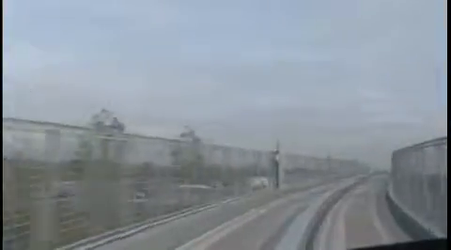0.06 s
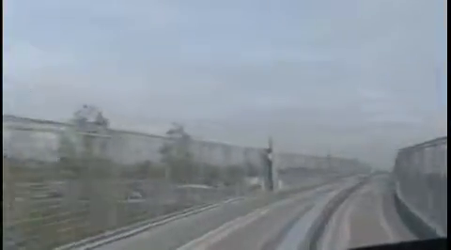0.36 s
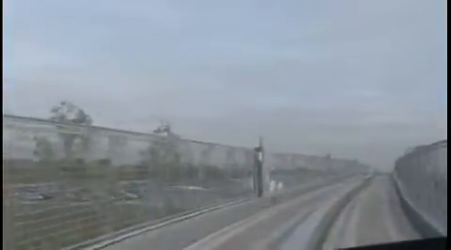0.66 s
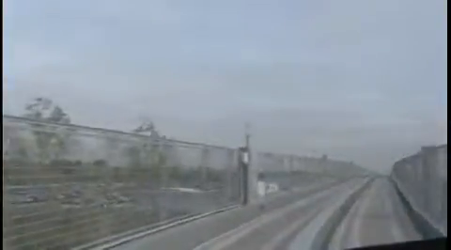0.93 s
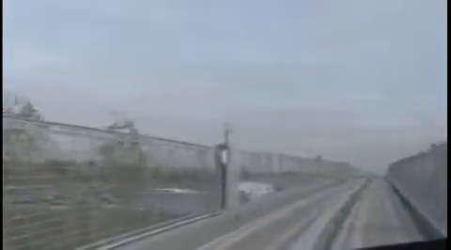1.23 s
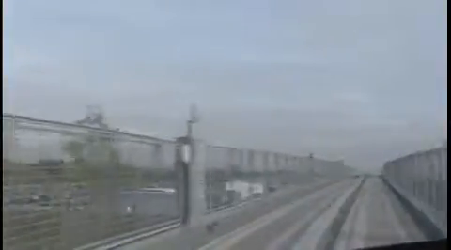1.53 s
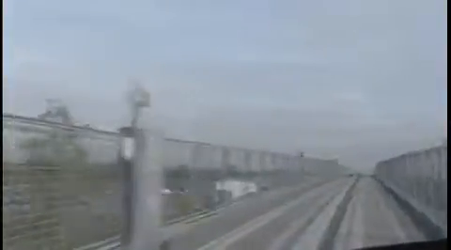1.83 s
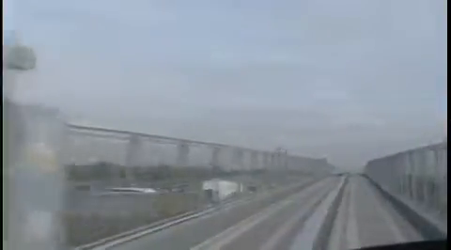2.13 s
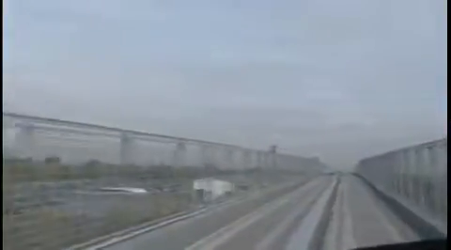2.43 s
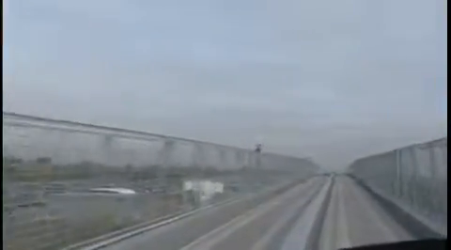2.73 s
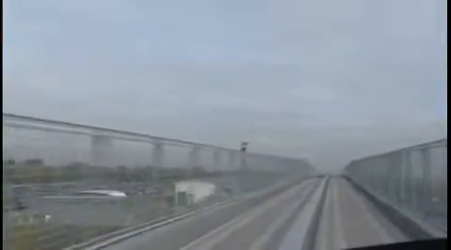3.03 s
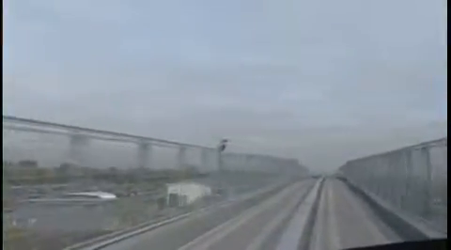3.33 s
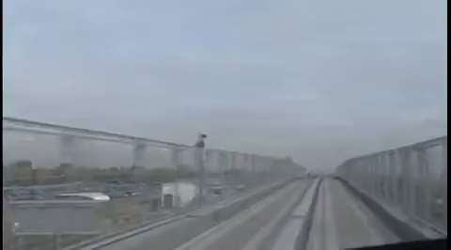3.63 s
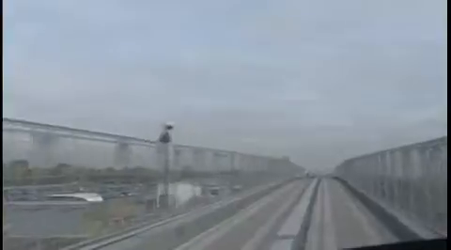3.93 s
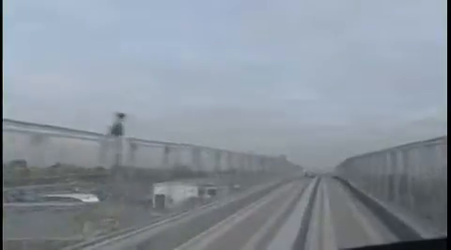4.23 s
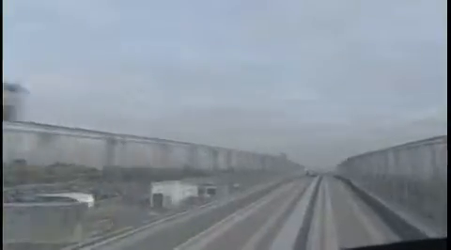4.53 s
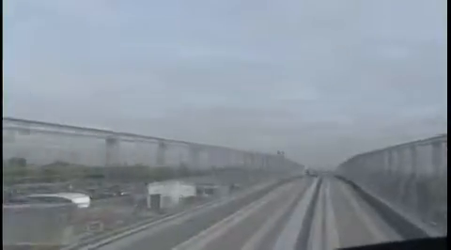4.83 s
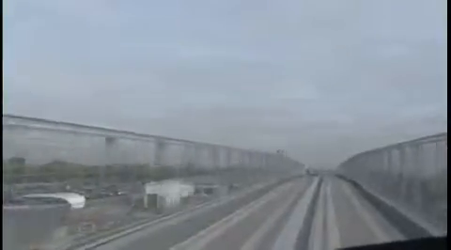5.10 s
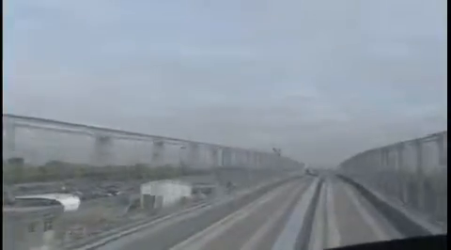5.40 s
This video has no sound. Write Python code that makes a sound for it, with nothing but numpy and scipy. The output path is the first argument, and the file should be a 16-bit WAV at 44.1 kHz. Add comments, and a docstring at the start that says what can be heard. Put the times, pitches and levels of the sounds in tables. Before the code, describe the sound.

Heard from the front of a small electric pod's cabin, rubber tyres roll at a steady speed over a concrete track, making a deep rumble above a low motor hum. Dull thumps come unevenly from bumps. Plastic trim ticks lightly, a loose fitting chatters faintly, and a latch clacks once before the middle. Something soft rustles now and then, and a panel gives a brief rasp near the end.

```python
"""Inside a small electric pod running at a steady speed along a concrete guideway.
The tyres roll over the rough track and make the cabin boom, with harder thumps at the bumps.
The turning drive hums, its electronics whine faintly and the air vents hiss. Plastic trim ticks,
a loose fitting chatters and a jolted latch clacks once. Something soft rustles now and then,
and near the end a bump makes a panel rasp against its seal."""
import sys
import numpy as np
from scipy import signal
from scipy.fft import rfft, irfft
from scipy.io import wavfile
from scipy.ndimage import uniform_filter1d

SR = 44100
rng = np.random.default_rng(int(sys.argv[2]) if len(sys.argv) > 2 else 0)


def wrap_up_sound(samples):
    """Save the sound to the file named by the first command line argument, as 16-bit audio."""
    columns = np.atleast_2d(samples).T
    # keep every value between -1 and 1, then stretch to whole-number steps
    tamed = np.clip(columns, -1, 1)
    steps = np.round(tamed * 32767).astype(np.int16)
    wavfile.write(sys.argv[1], SR, steps)


N = 245188
TIME = np.arange(N) / SR
BINS_HZ = np.maximum(np.arange(N // 2 + 1) * SR / N, 1)


def undb(db):
    """Turn decibels into a number to multiply by."""
    return 10 ** (np.asarray(db) / 20)


def unit(x):
    """Scale a sound to an average power of 1."""
    return x / np.sqrt(np.mean(x ** 2))


def even(x, span_s):
    """Hold the power near 1 over every stretch of span_s."""
    return x / np.sqrt(uniform_filter1d(x ** 2, max(int(span_s * SR), 2)) + 1e-12)


def curve(table):
    """Join (time_s, value) points with straight lines."""
    return np.interp(TIME, *np.transpose(table))


def noise():
    """White noise: an even hiss."""
    return rng.standard_normal(N)


def wander(rate_hz):
    """A smooth random drift of size about 1; a higher rate_hz makes it quicker."""
    return unit(irfft(rfft(noise()) * np.exp(-(np.arange(len(BINS_HZ)) * SR / N / rate_hz) ** 2), N))


def colour(x, points):
    """Shape a sound's bass and treble by (pitch_hz, gain_db) points, fading beyond both ends."""
    hz, db = np.transpose(points)
    ends = np.minimum(BINS_HZ / hz[0], 1) ** 2 * np.minimum(hz[-1] / BINS_HZ, 1) ** 2
    gain = undb(np.interp(np.log(BINS_HZ), np.log(hz), db))
    return irfft(rfft(x) * ends * gain, N)


def ring(x, notes):
    """Make a sound ring at (pitch_hz, width_hz, gain_db) notes; narrow ones last longer."""
    response = sum(undb(db) / (1 + 1j * (BINS_HZ ** 2 - hz ** 2) / (BINS_HZ * width_hz)) ** 2
                   for hz, width_hz, db in notes)
    return irfft(rfft(x) * response / np.sqrt(np.mean(np.abs(response) ** 2)), N)


def swell(peak_s, rise_s, fall_s):
    """A level that rises smoothly to 1 at peak_s and falls again."""
    distance = (TIME - peak_s) / np.where(TIME < peak_s, rise_s, fall_s)
    return 1 / np.cosh(np.clip(distance * np.sqrt(2), -20, 20))


def grains(spread_db):
    """Gritty noise: many tiny slips of unequal size."""
    return unit(noise() * undb(spread_db * wander(770)))


def hit(start_s, db):
    """One hard contact, a single sample long."""
    return undb(db) * (np.arange(N) == int(start_s * SR))


def rebounds(start_s, db, count, gap_s=(.003, .007), loss_db=3):
    """Ever weaker bounces at uneven gaps after start_s."""
    times = start_s + np.cumsum(rng.uniform(*gap_s, count))
    return sum(hit(at_s, db - loss_db * k) for k, at_s in enumerate(times))


def sway(mean_db, sway_db, loudest_s, cycle_s=2.2):
    """A level in decibels that swells and fades in a slow cycle."""
    return mean_db + sway_db * np.cos(2 * np.pi * (TIME - loudest_s) / cycle_s)


def tones(rows, waver_db, drift):
    """Thin (pitch_hz, level_db) tones that waver in level and, through drift, a little in pitch."""
    return sum(np.sqrt(2) * undb(db + waver_db * wander(13))
               * np.sin(2 * np.pi * hz * TIME + drift * wander(25)) for hz, db in rows)


# How loudly the rough track makes the cabin boom: time_s, level_db
BOOM_LEVEL = [(0, -27.5), (.45, -27), (.88, -26), (1.05, -28), (1.9, -26), (2.2, -26.5), (2.8, -25.5),
              (3.25, -27.5), (3.7, -24), (4.05, -26.5), (4.55, -25.5), (4.95, -27.5), (5.15, -25.5),
              (5.33, -33), (5.56, -25)]
# The deep boom of the cabin air: pitch_hz, gain_db
BOOM_COLOUR = [(15, -20.5), (24, -16), (33, 1), (42, -10.5), (58, -1), (70, 0), (85, -1), (104, -0.5),
               (125, -11.5), (150, -20), (220, -48)]
# The drone of the pod's body, also heard when a bump thuds: pitch_hz, gain_db
BODY_COLOUR = [(90, -16), (135, 2), (175, -2), (215, -6), (280, -21.5)]
# The tread's roar, heard through the shell: pitch_hz, gain_db
ROAR_COLOUR = [(300, -11), (450, 3), (700, -1.5), (830, -4), (895, -4), (1050, -2), (1170, -5.5),
               (1340, -11.5), (1700, -10), (1880, -17), (2400, -21.5), (2740, -33.5), (5000, -42),
               (9000, -44)]
# The hollow notes of the cabin: pitch_hz, width_hz, gain_db
CABIN_NOTES = [(572.7, 42, -0.5), (823.5, 82, -6), (948, 82, -3.5), (1076, 85, -6), (1235, 80, -17.5),
               (1464, 130, -12), (1980, 75, -19.5), (2263, 270, -22.5), (2574, 70, -22), (2854, 110, -25.5),
               (3180, 150, -31)]
# The rumble of the floor and wall panels: pitch_hz, gain_db
PANEL_COLOUR = [(190, -4.5), (260, 0.5), (310, 1.5), (360, -4.5), (430, -3), (520, -17.5)]
# How loud those panels are: time_s, level_db
PANEL_LEVEL = [(0, -48.5), (.75, -46), (.9, -52), (1.1, -45), (1.4, -53.5), (1.65, -44.5), (2.05, -46.5),
               (2.75, -49), (3.9, -49), (4.75, -49), (4.9, -47.5), (5.13, -46.5), (5.3, -50.5),
               (5.56, -50.5)]


def tyres():
    """The rough track shakes the air, body and panels; the tread roars and the hollow cabin rings."""
    boom_db = curve(BOOM_LEVEL)
    rough_db = boom_db - boom_db.mean()  # above zero on rougher stretches
    boom = even(colour(noise(), BOOM_COLOUR), span_s=.1) * undb(boom_db + .98 * wander(20))
    body = even(colour(noise(), BODY_COLOUR), span_s=.071) * undb(-43.5 + rough_db + 2.8 * wander(7.9))
    roar = unit(colour(noise(), ROAR_COLOUR)) * undb(-56.5 + .33 * rough_db + 1.8 * wander(7.2))
    hollow = unit(ring(noise(), CABIN_NOTES)) * undb(-59 + .15 * rough_db + 1.2 * wander(17))
    panels = unit(colour(noise(), PANEL_COLOUR)) * undb(curve(PANEL_LEVEL))
    return boom + body + panels + roar + hollow


# How fast the drive shaft turns: time_s, speed_hz
SHAFT_SPEED = [(0, 58.2), (.8, 58.5), (1.5, 58.3), (2.3, 58.25), (2.8, 58.35), (3.3, 58.2), (4.15, 58.2),
               (4.8, 58.4), (5.56, 58.1)]
# The hum at 5 times the shaft's speed: time_s, level_db
HUM_LEVEL = [(0, -42), (0.25, -43), (0.6, -49.5), (1.35, -41), (1.75, -43), (2.85, -52.5), (3.3, -41.5),
             (4.1, -42), (4.35, -46), (4.65, -43), (5.56, -47)]
# The gear whine at 17 times the shaft's speed: time_s, level_db
LOWER_GEAR_LEVEL = [(0, -68), (.2, -65), (0.78, -63.5), (.9, -70), (1.6, -69), (2.25, -65.5), (2.4, -70),
                    (3.55, -67.5), (4.0, -69), (4.2, -59.5), (4.55, -61), (4.75, -59.5), (4.88, -61),
                    (5.04, -57.5), (5.13, -68), (5.3, -65), (5.4, -57.5), (5.56, -57)]
# The gear whine at 18 times the shaft's speed: time_s, level_db
UPPER_GEAR_LEVEL = [(0, -68), (1.1, -70), (2.1, -68), (2.22, -61.5), (2.34, -72), (3.3, -69), (5.56, -67)]
# The shaft's steadier tones: cycles_per_turn, level_db
SHAFT_TONES = [(1, -35), (3, -51), (6, -59), (10, -68), (14, -76), (19, -68.5), (25, -79)]


def drive():
    """The shaft and gears hum at whole multiples of the turning speed, each tone wavering a little."""
    speed_hz = curve(SHAFT_SPEED) * (1 + .0007 * wander(12))
    angle = 2 * np.pi * np.cumsum(speed_hz) / SR

    def shaft_tone(cycles_per_turn, level_db):
        gain = np.sqrt(2) * undb(level_db + .5 * wander(12))
        return gain * np.sin(cycles_per_turn * angle + 2 * np.pi * rng.random() + .12 * wander(9.9))

    hum = shaft_tone(4, sway(mean_db=-46.5, sway_db=2.7, loudest_s=2.45))
    hum += shaft_tone(5, curve(HUM_LEVEL))
    gears = shaft_tone(17, curve(LOWER_GEAR_LEVEL)) + shaft_tone(18, curve(UPPER_GEAR_LEVEL))
    return hum + gears + sum(shaft_tone(*row) for row in SHAFT_TONES)


# The hiss of moving air: pitch_hz, gain_db
AIR_COLOUR = [(1500, -10.5), (3500, 1.5), (4300, -1), (4650, -8), (4850, -3.5), (5200, -2.5), (6200, -3),
              (8000, -12.5), (10500, -14), (12500, -22)]
# The thin whistles of the vents: pitch_hz, width_hz, gain_db
VENT_NOTES = [(4710, 46, 1.5), (5040, 360, -4), (6900, 110, -8)]
# The fan's faint tone: pitch_hz, level_db
FAN_TONE = [(374, -60.5)]


def ventilation():
    """Air hisses and whistles through the vents while the fan hums."""
    hiss = unit(colour(noise(), AIR_COLOUR)) * undb(-79.5 + .91 * wander(4))
    whistles = undb(-87) * unit(ring(noise(), VENT_NOTES))
    return hiss + whistles + tones(FAN_TONE, waver_db=5.5, drift=.49)


# The very high tones of the electronics: pitch_hz, gain_db
WHINE_TONES = [(9180, -4), (9414, 2), (9649, -11), (10121, -6)]


def electronics():
    """The electronics that power the drive whine faintly, slowly swelling and fading."""
    level_db = sway(mean_db=-92, sway_db=2.2, loudest_s=1.45)
    return undb(level_db) * tones(WHINE_TONES, waver_db=3.5, drift=.59)


# Bumps in the track: start_s, kick_db, pitch_hz, decay_s, thud_db, knock_db
BUMPS = [(0.071, -24.5, 115.4, 0.026, -36, -66.5), (0.377, -8.5, 70.4, 0.019, -47, -66),
         (0.482, -19, 105, 0.052, -36, -64.5), (0.743, -4.5, 96.5, 0.015, -30, -58),
         (1.468, -14.5, 114.4, 0.02, -29.5, -71.5), (1.738, -4, 88.4, 0.014, -40, -51.5),
         (2.242, -10, 81.2, 0.02, -26, -55), (2.291, -9, 56.7, 0.032, -43.5, -64),
         (2.503, -6.5, 69.7, 0.026, -36.5, -70), (3.407, -10.5, 64, 0.031, -37, -56.5),
         (4.279, -10.5, 71, 0.022, -32, -61.5), (4.37, -13, 82.4, 0.029, -34, -60),
         (4.535, -15.5, 97.3, 0.036, -45, -72), (4.76, -26, 111, 0.028, -33.5, -62),
         (5.064, -12.5, 54, 0.085, -47, -49), (5.166, -5.5, 53.4, 0.038, -36.5, -58)]
# The dull notes of the suspension: pitch_hz, width_hz, gain_db
KNOCK_NOTES = [(418, 410, 0), (714, 250, -5.5), (870, 88, -9.5)]


def bumps():
    """Each bump kicks the cabin into a short, low note; the body thuds, then the suspension knocks."""
    out = np.zeros(N)
    knock = ring(noise(), KNOCK_NOTES)
    thud = even(colour(noise(), BODY_COLOUR), span_s=.012)
    for start_s, kick_db, pitch_hz, decay_s, thud_db, knock_db in BUMPS:
        age_s = np.maximum(TIME - start_s, 0)
        rise_and_fade = (1 - np.exp(-age_s / .014)) * np.exp(-age_s / decay_s)
        out += undb(kick_db) * rise_and_fade * np.sin(2 * np.pi * pitch_hz * age_s)
        out += undb(thud_db) * swell(start_s + .017, rise_s=.013, fall_s=.031) * thud
        out += undb(knock_db) * swell(start_s + .032, rise_s=.0091, fall_s=.044) * knock
    return out


# Ticks of the plastic trim: start_s, strength_db, pitch_ratio, treble_db_per_octave, hollow_db
TICKS = [(.104, -47.5, 1, -4, 10), (.110, -56, .97, -4, 11), (.119, -55, 1, -3, 0),
         (.301, -54, .96, -2, -4), (1.7025, -40, .98, -.5, 1), (2.259, -54, 1, -1, 0),
         (3.447, -56, 1, 0, 0), (5.166, -51, .95, -4, 4)]
# The notes that a tick rings: pitch_hz, width_hz, gain_db
TICK_NOTES = [(710, 260, 8), (2690, 400, 5.5), (4100, 200, -17), (5130, 400, -10), (7450, 600, -17),
              (9700, 1500, -30)]


def trim_ticks():
    """A sharp snap and a brief crackle ring the plastic trim; softer contacts lose the treble."""
    out = np.zeros(N)
    crackle = even(noise(), span_s=.002)
    for start_s, strength_db, pitch_ratio, treble_tilt, hollow_db in TICKS:
        fade = (TIME >= start_s) * np.exp(-np.abs(TIME - start_s) / .005)
        force = hit(start_s, strength_db + 16) + undb(strength_db - 7.5) * fade * crackle
        hollow_note = (1900, 260, hollow_db)  # its strength depends on where the trim is struck
        notes = [(hz * pitch_ratio, width_hz, db + treble_tilt * max(np.log2(hz / 2000), 0))
                 for hz, width_hz, db in TICK_NOTES + [hollow_note]]
        out += ring(force, notes)
    return out


# Soft brushing strokes: peak_s, level_db, rise_s, treble_db_per_octave
STROKES = [(.508, -60.5, 0.02, 1), (.615, -68, 0.024, -1), (.758, -66.5, 0.026, 0.5),
           (1.013, -68.5, 0.014, 0.5), (1.134, -66, 0.037, -3), (1.195, -70, 0.018, 2),
           (1.772, -64.5, 0.026, 1.5), (1.906, -62.5, 0.059, -1.5), (2.268, -65.5, 0.023, 2.5),
           (2.525, -74, 0.018, 2.5), (2.66, -74, 0.028, -0.5), (2.87, -73, .02, -3), (3.43, -68, .015, -1),
           (3.562, -67, 0.04, -1.5), (3.89, -72, .01, -2), (4.29, -70.5, 0.0093, 1.5),
           (4.383, -64, 0.017, -0.5), (5.205, -59, 0.039, 0.5)]
# The brushing noise itself: pitch_hz, gain_db
RUSTLE_COLOUR = [(600, -11), (1400, 8), (2400, 1), (3300, -0.5), (4600, -2.5), (5800, -4.5), (7000, -7.5),
                 (9000, -9), (11000, -12.5), (12500, -13)]
# Narrow peaks that give the rustle a faint, glassy ring: pitch_hz, width_hz, gain_db
GLASSY_PEAKS = [(2750, 130, 1), (3500, 100, 1), (4170, 100, 2), (4760, 90, 3), (5430, 110, -1),
                (5920, 90, -2), (6400, 90, -3), (6950, 100, -2), (7430, 90, -3), (7930, 90, -3),
                (8760, 90, -5)]


def rustles(glassy_share=.2):
    """Something soft rustles with a faint, glassy ring; strokes vary in length and brightness."""
    out = np.zeros(N)
    brush = unit(colour(grains(spread_db=3.5), RUSTLE_COLOUR))
    glassy = unit(ring(grains(spread_db=3.5), GLASSY_PEAKS))
    spectrum = rfft(np.sqrt(1 - glassy_share) * brush + np.sqrt(glassy_share) * glassy)
    for peak_s, level_db, rise_s, treble_tilt in STROKES:
        stroke = unit(irfft(spectrum * undb(treble_tilt * np.log2(BINS_HZ)), N))
        out += undb(level_db) * swell(peak_s, rise_s, fall_s=.98 * rise_s) * stroke
    return out


def hollow_colour(x, delay_s, copy_db):
    """A copy added after a very short delay makes the rustles sound hollow."""
    gain = undb(copy_db)
    return (x + gain * np.interp(TIME - delay_s, TIME, x)) / np.sqrt(1 + gain ** 2)


# Hits of a small loose fitting: start_s, strength_db
FITTING_HITS = [(1.795, -69), (1.815, -60.5), (1.871, -56.5), (1.904, -70), (1.928, -62.5), (1.987, -69),
                (3.424, -76), (3.602, -62.5), (3.626, -70.5), (5.090, -78)]
# Its metal notes: pitch_hz, width_hz, gain_db
FITTING_NOTES = [(3170, 200, -7), (4110, 100, 2), (4300, 100, -1.5), (4790, 80, 1.5), (5080, 150, 0),
                 (6330, 160, -12), (6880, 200, -14), (7480, 140, -14)]


def fitting_chatter():
    """A loose metal fitting hits its seat, bounces amid a buzz of tiny contacts and rings."""
    out = np.zeros(N)
    buzz = grains(spread_db=11.5)
    for start_s, strength_db in FITTING_HITS:
        force = hit(start_s, strength_db + 25) + rebounds(start_s, strength_db + 14, count=3)
        force += undb(strength_db - 5) * swell(start_s, rise_s=.008, fall_s=.008) * buzz
        # Each hit lands on a new spot, which changes the mix of notes.
        notes = [(hz, width_hz, db + 1.5 * rng.standard_normal()) for hz, width_hz, db in FITTING_NOTES]
        out += ring(force, notes)
    return out


# The notes of the latch: pitch_hz, width_hz, gain_db
LATCH_NOTES = [(560, 130, 11), (760, 180, 12), (1080, 110, 6), (1480, 140, 2), (1930, 110, 2),
               (2620, 260, 2.5), (3494, 90, -3), (4200, 130, 0), (4790, 100, 1.5), (5276, 60, -7),
               (6120, 60, -7), (7095, 50, -8), (7440, 50, -7), (7920, 50, -8), (8742, 50, -9)]


def latch_clack(start_s=2.2655, strength_db=-20):
    """Jolted by a bump, a latch strikes its catch, bounces twice and rings briefly."""
    force = hit(start_s, strength_db) + rebounds(start_s, strength_db - 7, count=2)
    return ring(force, LATCH_NOTES)


# Pulls on a panel as it bends over a bump: peak_s, level_db, rise_s, fall_s
PANEL_PULLS = [(5.185, -59, .004, .005), (5.217, -48, .012, .012), (5.250, -61.5, .012, .024)]
# The notes of that panel: pitch_hz, width_hz, gain_db
RASP_NOTES = [(1490, 270, 5), (2280, 510, -.5), (2930, 170, -4), (3440, 110, -1.5), (3900, 210, 0),
              (4450, 140, 4), (4840, 150, 3), (5430, 110, 4), (5660, 130, 1), (6120, 260, -5),
              (8050, 180, -11)]


def panel_rasp(slips_per_s=245):
    """A panel sticks and slips against its seal in a few gritty pulls, ringing as it goes."""
    pull = sum(undb(db) * swell(peak_s, rise_s, fall_s) for peak_s, db, rise_s, fall_s in PANEL_PULLS)
    slip_count = np.floor(np.cumsum(slips_per_s * (1 + .1 * wander(60))) / SR)
    slips = unit(np.diff(slip_count, prepend=0) * undb(3.5 * wander(200)))  # one click for each slip
    return pull * even(ring(slips + grains(spread_db=8), RASP_NOTES), span_s=.012)


def scene():
    """Everything as heard from the front of the cabin, in one channel."""
    hollow_rustles = hollow_colour(rustles(), delay_s=.00225, copy_db=1)
    ride = tyres() + bumps() + drive() + ventilation() + electronics()
    rattles = trim_ticks() + fitting_chatter() + latch_clack() + panel_rasp()
    return (ride + rattles + hollow_rustles)[None]


def record(dry):
    """Cut away the highest treble, above 12600 Hz."""
    return signal.sosfilt(signal.ellip(8, .2, 70, 12600, fs=SR, output="sos"), dry)


dry = scene()
out = record(dry)
wrap_up_sound(out)
```